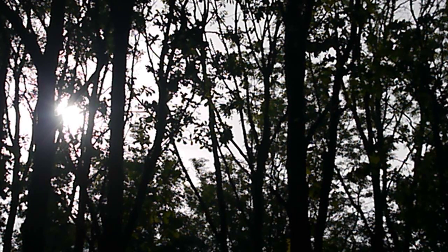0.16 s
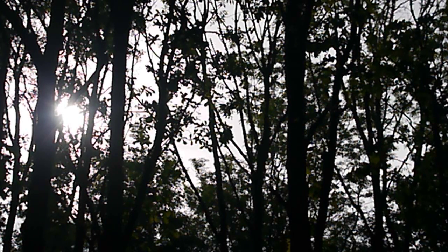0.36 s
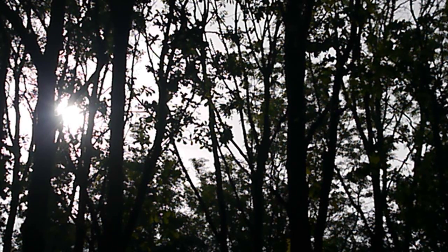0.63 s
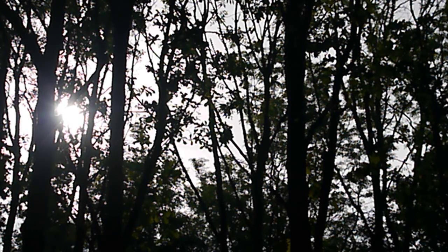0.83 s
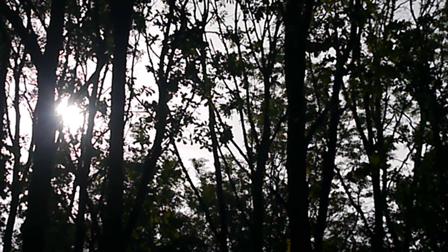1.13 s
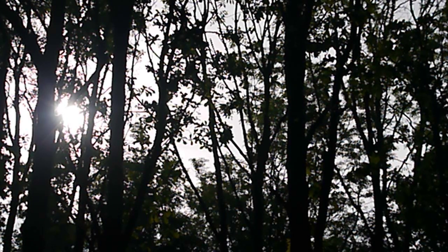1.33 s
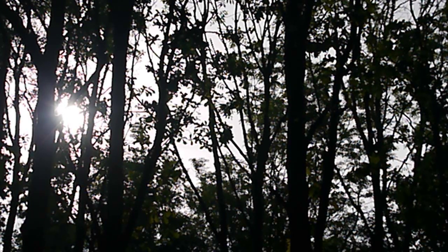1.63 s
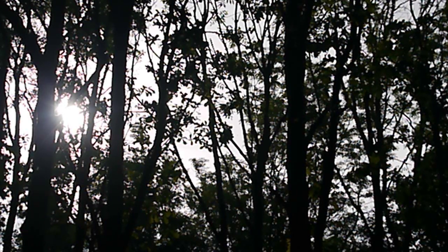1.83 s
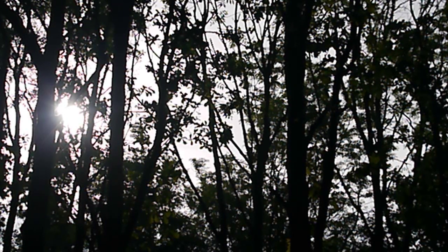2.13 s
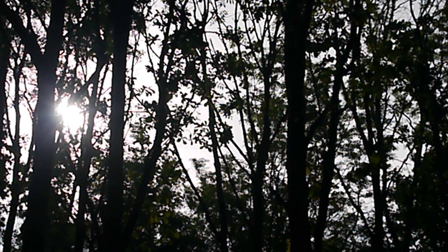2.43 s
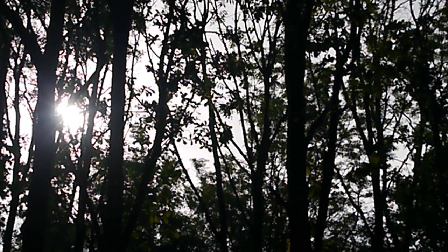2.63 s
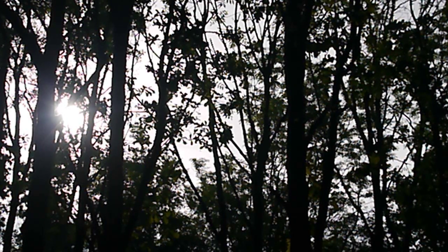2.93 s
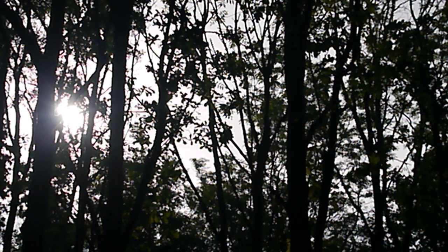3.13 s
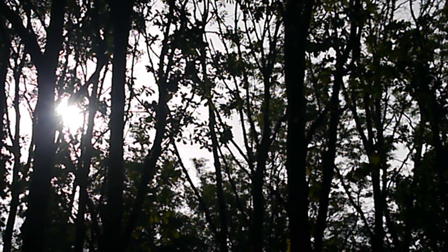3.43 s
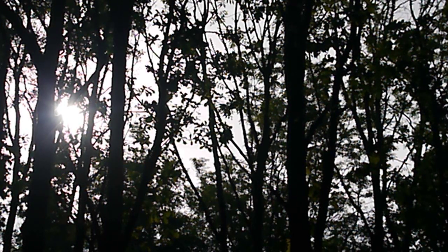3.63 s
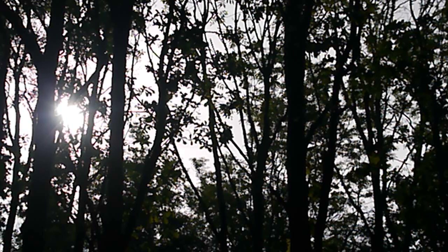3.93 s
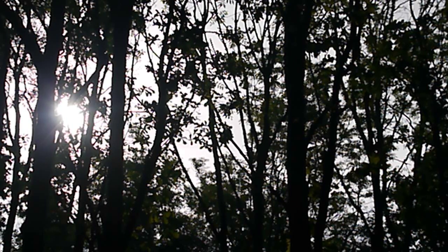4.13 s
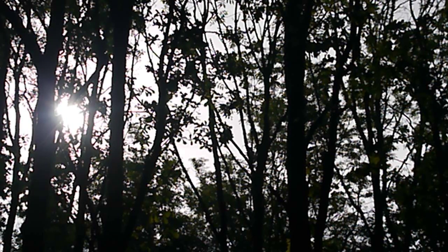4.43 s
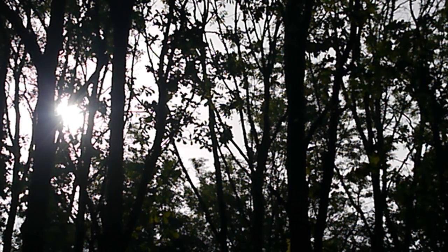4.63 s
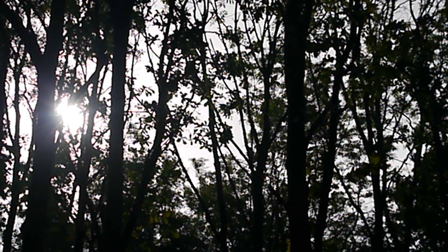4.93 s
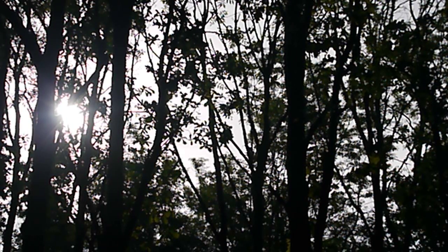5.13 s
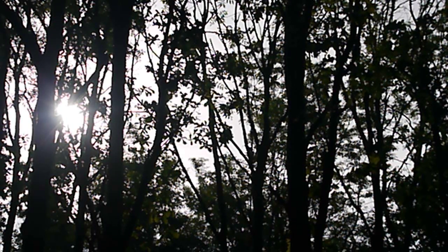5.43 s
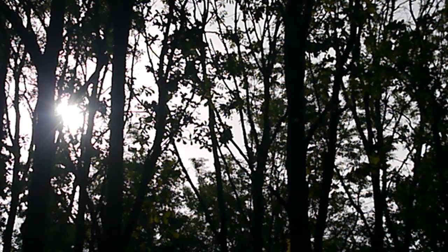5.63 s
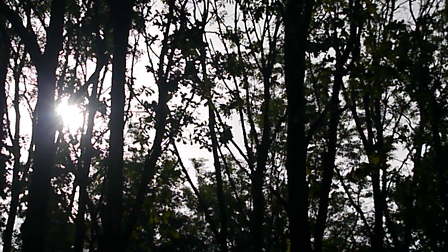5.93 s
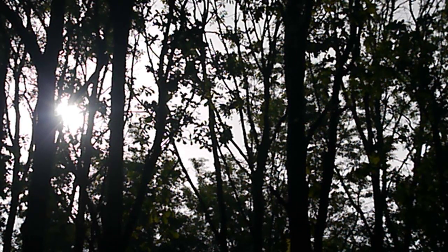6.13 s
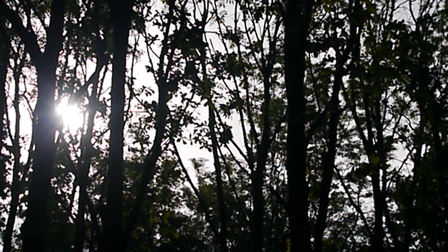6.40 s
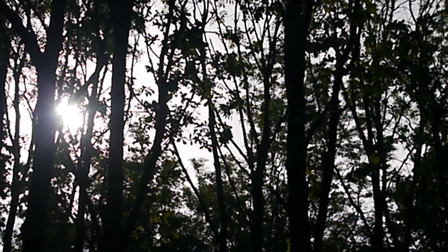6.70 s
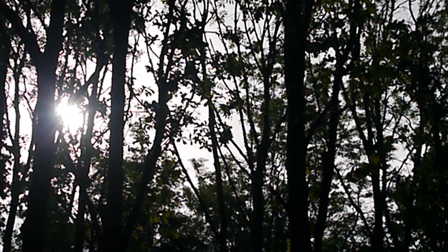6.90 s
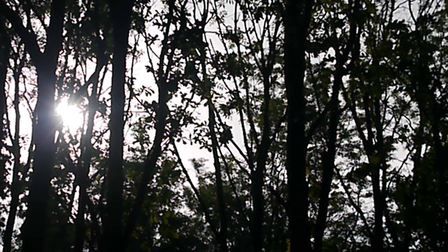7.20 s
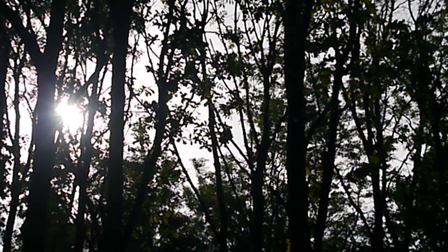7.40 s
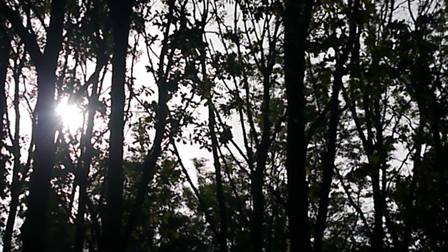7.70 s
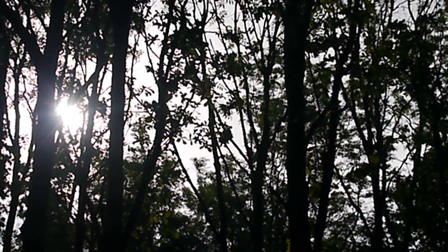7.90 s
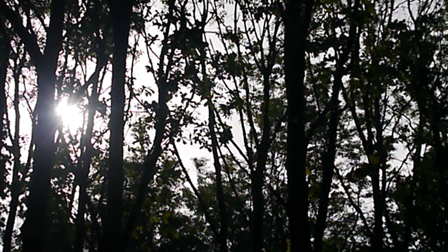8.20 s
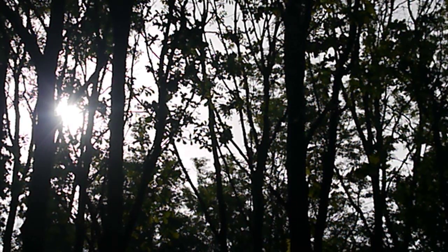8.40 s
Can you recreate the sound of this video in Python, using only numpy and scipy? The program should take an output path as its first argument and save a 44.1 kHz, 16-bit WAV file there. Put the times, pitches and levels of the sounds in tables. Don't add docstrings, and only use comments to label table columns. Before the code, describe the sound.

A single woody knock reverberates among trunks, then thin bird chirps, flutey notes and high whistles build up over soft, throaty pigeon coos.

```python
import sys
import numpy as np
from scipy import signal
from scipy.fft import rfft, irfft, next_fast_len
from scipy.io import wavfile
from scipy.ndimage import uniform_filter1d, map_coordinates

SR = 44100
rng = np.random.default_rng(int(sys.argv[2]) if len(sys.argv) > 2 else 0)


def bounce(signal):
    frames = np.transpose(np.atleast_2d(signal))
    limited = np.clip(frames, -1, 1)
    pcm = np.round(limited * 32767).astype(np.int16)
    wavfile.write(sys.argv[1], SR, pcm)


def undo_db(level):
    steps = np.asarray(level, float) / 20
    return 10 ** steps


N = 377055

# (time [s], level [dB])
AIR_LEVEL = [(0, -58), (1.3, -58), (1.83, -60), (3.62, -58), (6.119, -58.5), (7.241, -58), (8.55, -58.5)]
# (frequency [Hz], level [dB])
AIR_COLOUR = [(25, -43), (64, -16), (95, -21), (190, -16), (300, -10.5), (508, -4), (664, -5.5),
              (956, -2.5), (1380, -9.5), (2290, -15.5), (3200, -17), (4500, -21.5), (7300, -21.5),
              (8000, -25.5)]
# (frequency [Hz], level at the start [dB], growth [dB/s])
ENGINE_ORDERS = [
    (66, -80, 0.1),
    (132, -86, .9),
    (590, -69, -.9),
]
# (time [s], peak level [dB], centre frequency [Hz], T60 [s])
TWIGS = [
    (.698, -57, 4300, 0.019),
    (1.576, -53, 6700, 0.02),
    (1.617, -54, 4380, 0.0072),
    (4.292, -56, 3300, 0.024),
    (4.875, -55, 215, 0.075),
    (5.998, -52, 4380, 0.018),
    (5.972, -55, 6050, 0.019),
    (6.702, -52, 260, 0.14),
    (7.484, -55.5, 5730, 0.028),
    (8.06, -58, 4300, 0.022),
]
# (time [s], peak level [dB])
BLOW = (1.1272, -3.5)
# (frequency [Hz], level [dB], T60 [s])
TIMBER_MODES = [(155, -13.5, 0.029), (260, 1.5, 0.022), (800, -2.5, 0.021), (1060, -9, .018),
                (1380, -7.5, 0.016), (1900, -29, .03)]
# (frequency [Hz], level [dB])
ANSWER_COLOUR = [(35, -85), (60, -49), (156, -19), (290, -4.5), (400, -14), (526, -13.5), (660, -5.5),
                 (750, -1.5), (831, -5), (956, -9), (1770, -9.5), (2440, -25.5), (3160, -20.5),
                 (3930, -35.5), (5000, -38), (7000, -51), (9100, -86), (15400, -120)]
# (frequency [Hz], T60 [s])
ANSWER_DECAY = [(100, 1.75), (300, 1.6), (500, 1.7), (780, 1.9), (1100, 1.55), (2000, 1.31), (5000, 0.64)]
# (delay [s], level [dB])
TRUNK_ECHOES = [(0.036, 2.5), (0.082, 2.4), (0.142, 0.6), (.155, 4), (.29, 1.8)]
# (time [s], pitch [Hz], level [dB], hoarseness [0-1])
DISTANT_COOS = [
    [(0, 379.5, -62, .3), (.08, 430, -62, .5), (.17, 460, -63, .4)],
    [(3.84, 540, -64, .4), (3.9, 566, -63, .4), (3.97, 550, -66, .3)],
    [(4.3, 575, -64, .3), (4.45, 545, -65, .2), (4.62, 531, -63.5, .2), (4.7, 504, -62, .2)],
    [(4.9, 500, -65, .2), (5.01, 485, -63, .2)],
    [(5.58, 496, -66, .3), (5.7, 491, -61.5, .1), (5.76, 485, -66, .2)],
]
# (time [s], length [s], top pitch [Hz], level [dB])
ARCHED_COOS = [
    (6.312, 0.213, 692, -56.5),
    (6.734, 0.11, 722, -59.5),
]
# (time [s], pitch [Hz], level [dB], hoarseness [0-1])
COOS = [
    [(.315, 455, -61.5, 0.58), (.37, 521.7, -64.5, 1), (.44, 500, -61.5, 0.42), (.57, 457, -59.5, 0.4),
     (.62, 428, -68, 0.4)],
    [(.96, 419, -61, 0.74), (1, 470, -63, 0.95), (1.14, 512, -66, 0.6)],
    [(6.1, 430, -57, .1), (6.135, 491, -50.5, 0.35), (6.23, 501, -51.5, 0.56), (6.28, 520, -61, 1.09),
     (6.48, 513, -60, 0.74), (6.52, 506, -48.5, 0.2), (6.545, 439.5, -50.5, 0.27)],
    [(6.705, 440, -54.5, 0.4), (6.74, 506, -50.5, 0.55), (6.87, 533, -58, .8), (6.915, 512, -46.5, 0.3),
     (7.01, 485, -46.5, 0.13), (7.06, 431.5, -51, 0), (7.09, 413, -65, 0.1)],
    [(7.343, 434, -47.5, 0.14), (7.36, 495, -49.5, 0.25), (7.39, 528.5, -53, 0.6), (7.44, 522, -51, 0.63),
     (7.47, 507.7, -47, 0.4), (7.59, 475, -49, .55), (7.63, 455, -60.5, .7), (7.69, 537, -62.5, 0.34)],
    [(7.698, 507, -48, 0), (7.72, 487, -45, 0.18), (7.85, 451, -48.5, 0), (7.88, 440, -54.5, 0.17),
     (7.92, 435, -57, 0.4), (7.99, 415.5, -64, 0.24), (8.06, 414, -65, .3)],
    [(8.378, 420, -56, .05), (8.4, 488, -45.5, 0.07), (8.43, 541, -48.5, 0), (8.46, 574, -58, 0.46),
     (8.505, 538, -61, 0.78), (8.55, 500, -51, 1.16)],
]
# (time [s], length [s], start pitch [Hz], end pitch [Hz], level [dB])
TWITTERS = [(2.866, .2, 6050, 5150, -52), (3.074, .21, 5890, 5050, -53), (5.471, 0.13, 3310, 2045, -50),
            (5.859, 0.35, 8060, 6800, -52), (5.986, 0.21, 7940, 6780, -46), (6.061, 0.38, 4470, 2800, -58),
            (6.202, 0.4, 3044, 2296, -57), (6.546, 0.3, 7900, 5910, -63), (7.034, 0.11, 3890, 2724, -57.5),
            (7.511, 0.2, 4520, 3070, -69), (2.994, 0.14, 8750, 5940, -62.5), (3.166, .1, 6830, 5580, -61),
            (3.431, 0.27, 4315, 3416, -49.5), (8.28, .15, 6300, 5270, -65.5),
            (8.423, .13, 4680, 3360, -47.5), (7.301, 0.27, 3755, 2512, -52)]
# (time [s], length [s], pitch [Hz], level [dB])
FINCH_HELD = [(0, 0.016, 3786, -57), (.03, .02, 3470, -63.5), (.035, 0.012, 3780, -61),
              (.165, 0.052, 4296, -47), (.25, 0.047, 4290, -53.5), (.33, 0.1, 4260, -57),
              (.48, 0.072, 4260, -62), (.2, 0.14, 7270, -82), (.4, 0.21, 7400, -79.5),
              (.53, .06, 4200, -63.5), (1.96, 0.17, 4190, -69), (2.06, 0.046, 5660, -65),
              (3.33, 0.13, 4570, -54), (3.33, 0.035, 4010, -62), (3.45, .03, 4100, -57.5),
              (3.5, 0.043, 4145, -54.5), (3.66, 0.071, 4350, -56.5), (3.76, .1, 4340, -59),
              (3.88, 0.14, 4320, -66)]
# (time [s], start pitch [Hz], end pitch [Hz], level [dB])
FINCH_CHIRPS = [(0, 4510, 3480, -53.5), (.01, 6600, 5740, -71), (.02, 5460, 5000, -63),
                (.058, 5040, 4590, -56.5), (.09, 5170, 4700, -58), (.26, 4210, 4040, -52),
                (2.862, 6170, 5070, -59), (2.98, 5450, 4960, -57), (3.25, 5580, 5000, -59),
                (3.29, 5410, 4930, -56.5), (3.385, 4150, 3570, -56.5), (3.44, 4140, 3330, -56.5),
                (3.74, 4040, 3830, -58.5)]
# (time [s], length [s], pitch [Hz], level [dB])
THRUSH_HELD = [(3.7, .03, 1870, -60), (3.985, .03, 1830, -62), (4.35, .1, 2630, -68),
               (4.88, 0.046, 2230, -56.5), (4.485, .02, 2020, -56), (4.39, 0.12, 2020, -44.5),
               (4.64, 0.15, 2643, -58), (5.29, 0.1, 2560, -52.5), (5.48, 0.14, 1900, -49)]
# (time [s], start pitch [Hz], end pitch [Hz], level [dB])
THRUSH_RISES = [(3.695, 1830, 1900, -58), (3.715, 1900, 2180, -55.5), (3.975, 1790, 1870, -58),
                (4.015, 1873, 2190, -52.5), (4.29, 1827, 1860, -50), (4.36, 1904, 2040, -48.5),
                (4.82, 1802, 2080, -48), (4.86, 2140, 2250, -51), (5.25, 2380, 2556, -59.5),
                (5.64, 1950, 2010, -55.5)]
# (time [s], start pitch [Hz], end pitch [Hz], level [dB])
THRUSH_FALLS = [(4.72, 2005, 1700, -54), (4.755, 2300, 1750, -56), (4.96, 1950, 1790, -51.5),
                (5.01, 3150, 3050, -63.5), (5.18, 1840, 1780, -62), (5.26, 1735, 1700, -60),
                (5.58, 2500, 1910, -49.5)]
# (time [s], length [s], pitch [Hz], level [dB])
WARBLER_HELD = [(5.28, 0.074, 4450, -63.5), (5.82, .08, 4300, -67), (6.49, 0.029, 3880, -57),
                (6.69, 0.08, 4180, -60), (6.9, 0.027, 3810, -47.5), (6.96, .035, 3630, -46.5),
                (7.63, 0.026, 2084, -64), (8.028, 0.02, 3273, -54.5), (8.03, 0.061, 5580, -72),
                (8.07, .04, 4490, -74), (8.165, 0.027, 5450, -69), (8.18, 0.013, 2790, -59.5),
                (8.2, 0.015, 3320, -61), (8.23, 0.018, 2995, -56), (8.247, .012, 2860, -61),
                (8.515, 0.027, 3380, -50.5), (8.313, 0.0084, 4300, -55.5), (8.37, 0.017, 3360, -52)]
# (time [s], start pitch [Hz], end pitch [Hz], level [dB])
WARBLER_CHIRPS = [(5.348, 4075, 3540, -47.5), (5.375, 3534, 3020, -50.5), (5.41, 4100, 3036, -49),
                  (5.45, 3966, 3020, -55), (5.51, 2740, 2580, -52.5), (5.465, 3195, 2394, -46),
                  (6.062, 4500, 3800, -51), (6.088, 4010, 3320, -49.5), (6.17, 4400, 3020, -47.5),
                  (6.58, 3680, 3390, -57.5), (6.835, 4204, 3700, -49), (6.865, 3200, 2550, -59.5),
                  (6.93, 3810, 3016, -44.5), (7.01, 3665, 2630, -48), (7.105, 3900, 3530, -54.5),
                  (7.88, 2840, 2530, -61)]
# (time [s], start pitch [Hz], end pitch [Hz], level [dB])
WARBLER_FLICKS = [(8.015, 3050, 3270, -58.5), (8.195, 2750, 3050, -57), (5.9, 1800, 2300, -64)]
# (time [s], start pitch [Hz], end pitch [Hz], level [dB])
DEEP_CHIRPS = [(5.63, 3356, 2850, -52), (5.68, 2560, 2234, -52), (6.27, 4300, 3205, -48.5),
               (6.85, 3886, 3440, -46.5), (7.12, 3700, 2700, -51.5), (7.26, 3500, 2810, -53),
               (7.54, 3600, 3010, -61), (7.66, 3130, 2437, -55), (7.77, 3320, 3000, -55.5),
               (8.155, 6400, 5400, -62), (8.28, 6470, 5420, -62.5), (8.305, 5350, 4900, -60),
               (8.328, 4230, 3490, -51), (8.39, 3300, 2775, -52.5)]
# (time [s], pitch [Hz], level [dB])
PIPS = [(3.165, 3134, -66), (3.24, 2604, -67), (7.835, 1945, -62), (8.07, 2090, -60.5), (8.305, 1960, -64),
        (8.47, 1975, -72)]
# (time [s], length [s], pitch [Hz], level [dB])
ACCENTS = [(5.475, 0.039, 2560, -50.5), (5.35, .03, 1900, -64), (6.84, .03, 3900, -49),
           (6.875, 0.029, 3560, -51.5), (7.105, .025, 3600, -53.5), (7.5, 0.037, 3570, -60),
           (7.555, .025, 3220, -58), (.1, .03, 5020, -60.5), (8.2, .05, 3350, -62), (2.42, .12, 7900, -66),
           (2.56, .1, 7850, -66), (5.836, .012, 7250, -43), (4.368, .015, 1960, -55),
           (4.487, .015, 2020, -54), (5.355, .015, 3750, -54), (5.385, .015, 3800, -55),
           (5.47, .015, 3900, -56), (6.935, .02, 3250, -54), (7.03, .05, 2750, -57), (5.6, .05, 6800, -68)]
# (time [s], start pitch [Hz], end pitch [Hz], level [dB])
UPFLICKS = [(7.685, 2680, 3000, -59.5), (7.91, 2680, 2950, -59), (8.243, 2650, 3020, -55),
            (5.425, 3100, 3600, -55), (8.37, 3250, 3450, -55.5)]
# (time [s], length [s], pitch [Hz], level [dB])
ROBIN_HELD = [(2.29, .1, 7880, -64.5), (2.695, 0.032, 7720, -63.5), (4.7, 0.08, 6610, -55),
              (4.805, 0.024, 6320, -48.5), (5.09, 0.066, 7620, -45), (5.162, .02, 5580, -49.5),
              (5.822, .035, 7287, -38), (5.855, 0.011, 6430, -67.5), (5.888, .012, 7340, -43.5),
              (5.91, .08, 5220, -70.5), (6.05, .092, 7156, -41), (6.2, 0.1, 7050, -43.5),
              (6.205, 0.018, 8024, -42.5), (6.33, .1, 7130, -45.5), (6.4, 0.036, 8047, -41),
              (6.41, 0.058, 6980, -45), (6.52, .073, 7490, -39), (6.53, 0.028, 6370, -52.5),
              (6.575, 0.017, 6780, -42.5), (6.655, 0.1223, 7140, -38.5), (6.762, 0.024, 7970, -43)]
# (time [s], start pitch [Hz], end pitch [Hz], level [dB])
ROBIN_CHIRPS = [(2.75, 7830, 7440, -54.5), (4.678, 6530, 6720, -64), (4.99, 7850, 7420, -62),
                (5.128, 6450, 5940, -54.5), (5.135, 7450, 6570, -47), (5.153, 6890, 5590, -49),
                (6.015, 7980, 6800, -49), (6.16, 7820, 6230, -59), (6.37, 5500, 4650, -71),
                (6.517, 7630, 6300, -52.5), (6.567, 6980, 5650, -57)]
# (time [s], start pitch [Hz], end pitch [Hz], level [dB])
ROBIN_SLURS = [(4.975, 6860, 6340, -52.5), (5.02, 8000, 7550, -49), (5.07, 6860, 6370, -43.5),
               (5.535, 7980, 7750, -58), (5.6, 7040, 6600, -67), (5.61, 8050, 7600, -58.5),
               (5.68, 7280, 7800, -58), (5.76, 7680, 8060, -49.5)]
# (frequency [Hz], level [dB])
CONVERTER = [(7000, -1), (7700, -3), (8000, -11.5), (8400, -13.5), (8800, -29), (9100, -35)]


def unit(x):
    return x / np.sqrt(np.mean(x ** 2) + 1e-20)


def along(points, hz):
    f, v = np.transpose(points)
    return np.interp(np.log(hz + 1), np.log(f + 1), v)


def wobble(count, rate):
    knots = rng.standard_normal(int(count * rate / SR) + 4)
    return map_coordinates(knots, [np.arange(count) * rate / SR])


def smooth(knots, place):
    curve = map_coordinates(knots, [place])
    return curve - curve.mean()


def filtered(x, response):
    m = next_fast_len(len(x) + 8192)
    return irfft(rfft(x, m) * response(np.fft.rfftfreq(m, 1 / SR)), m)[:len(x)]


def add(track, s, sound):
    part = track[round(s * SR):][:len(sound)]
    part += sound[:len(part)]


def air():
    z = signal.stft(rng.standard_normal(N + 512), nperseg=512)[2]
    patches = uniform_filter1d(rng.standard_normal(z.shape), 8, 0)
    patches = uniform_filter1d(patches, 30, 1)
    noise = signal.istft(z * undo_db(0.87 * unit(patches)), nperseg=512)[1][:N]
    level_db = np.interp(np.arange(N) / SR, *np.transpose(AIR_LEVEL))
    return undo_db(level_db + 5.0) * unit(filtered(noise, lambda hz: undo_db(along(AIR_COLOUR, hz))))


def engine():
    swell_db, speed_wander = 2, 0.004
    turns = np.cumsum(1 + speed_wander * wobble(N, 2.7)) / SR
    t, out = np.arange(N) / SR, np.zeros(N)
    for hz, db, growth in ENGINE_ORDERS:
        level_db = db + growth * t + swell_db * wobble(N, 2.51)
        out += undo_db(level_db) * np.sin(2 * np.pi * hz * turns)
    return out


def twigs():
    out, t = np.zeros(N), np.arange(SR // 5) / SR
    for s, db, hz, t60 in TWIGS:
        width = 0.25 if hz > 1000 else 0.5
        noise = rng.standard_normal(len(t))
        puff = filtered(noise, lambda f: 1 / (1 + (np.log(f / hz + 1e-6) / width) ** 4))
        add(out, s, undo_db(db + 1.5 - 60 * t / t60) * unit(puff))
    return out


def timber_ring():
    t = np.arange(SR // 5) / SR
    ring = sum(undo_db(level - 60 * t / t60) * -np.sin(2 * np.pi * hz * t) for hz, level, t60 in TIMBER_MODES)
    return ring * (1 - np.exp(-(t / 0.0022) ** 2))


def wood_answer():
    hz, t, z = signal.stft(rng.standard_normal(2 * SR), SR, nperseg=256)
    lumps_db = sum(level * np.exp(-((t - delay) / 0.008) ** 2) for delay, level in TRUNK_ECHOES)
    age = np.sqrt(t ** 2 + 0.16 ** 2) - 0.12
    fade_db = lumps_db - 60 * age / along(ANSWER_DECAY, hz)[:, None]
    tail = signal.istft(z * undo_db(fade_db), SR, nperseg=256)[1]
    tail = unit(filtered(tail, lambda hz: undo_db(along(ANSWER_COLOUR, hz))))
    return tail * (1 - np.exp(-np.arange(len(tail)) / SR / 0.0013))


def blow():
    out = np.zeros(N)
    s, db = BLOW
    add(out, s, undo_db(db) * timber_ring())
    add(out, s + 0.002, undo_db(-38.5) * wood_answer())
    return out


def echoes(x, t60, direct_db, gather, near=0):
    t = np.arange(min(SR, round(0.8 * t60 * SR))) / SR
    tail = rng.standard_normal(len(t)) * undo_db(-60 * t / t60) * (1 - np.exp(-t / gather))
    tail *= 1 + near * np.exp(-t / 0.025)
    tail /= np.linalg.norm(tail)
    tail[0] = undo_db(direct_db)
    return signal.fftconvolve(x, tail)


def arched_coos():
    arch = [0.9, 0.96, 1, 0.96, 0.9]
    return [[(s + length * k / 4, hz * share, db, 0.06) for k, share in enumerate(arch)]
            for s, length, hz, db in ARCHED_COOS]


def pigeon(coos, t60, direct_db):
    rattle_hz, rattle_depth = 70.7, 1.04
    out, flutter, waver = np.zeros(N), wobble(N, 110), wobble(N, 110)
    rattle_turns = np.cumsum(rattle_hz * (1 + 0.147 * wobble(N, 30))) / SR
    flutter = 0.77 * flutter + rattle_depth * np.cos(2 * np.pi * rattle_turns)
    for rows in coos:
        s, *cols = np.transpose(rows)
        span = slice(round(s[0] * SR), min(round(s[-1] * SR), N))
        t = np.arange(N)[span] / SR
        hz, db, hoarse = [np.interp(t, s, c) for c in cols]
        tone = np.sin(2 * np.pi * np.cumsum(hz * (1 + 0.05 * hoarse * waver[span])) / SR)
        edges = np.clip(np.minimum(t - s[0], s[-1] - t) / 0.01, 0, 1)
        coo = undo_db(db) * edges * (1 + hoarse * flutter[span]) * tone
        add(out, s[0], echoes(coo, t60, direct_db, gather=0.087))
    return out


def held(rows, t60):
    return [(s, length, hz, hz * (1 - 0.0063), db, t60) for s, length, hz, db in rows]


def glides(rows, length, t60):
    return [(s, length, from_hz, to_hz, db, t60) for s, from_hz, to_hz, db in rows]


def songbird(notes, direct_db, gather, waver, flutter_db, settle, chirp_rate=0, near=0):
    out = np.zeros(N)
    for s, length, from_hz, to_hz, db, t60 in notes:
        pitch_knots, breath_knots, timing_knots = rng.standard_normal((3, 200))
        t = np.arange(round(np.clip(length, 0.006, 0.6) * SR)) / SR
        u = t / t[-1]
        if chirp_rate:
            u = (t * chirp_rate + 0.33 * smooth(timing_knots, 15 * t)) % 1
        hz = to_hz + (from_hz - to_hz) * (1 - u) ** settle
        hz = hz * (1 + waver * smooth(pitch_knots, 240 * t))
        breath_db = flutter_db * smooth(breath_knots, 150 * t) - 4 * u
        breath = np.abs(np.sin(np.pi * u)) ** 0.25 * undo_db(breath_db)
        whistle = breath * np.sin(2 * np.pi * np.cumsum(hz) / SR)
        gain = undo_db(db) * np.sqrt(SR / 10) / np.linalg.norm(whistle)
        add(out, s, gain * echoes(whistle, t60, direct_db, gather, near))
    return out


def pigeons():
    coos = pigeon(DISTANT_COOS, t60=0.5, direct_db=3)
    coos += pigeon(arched_coos(), t60=0.3, direct_db=5)
    return coos + pigeon(COOS, t60=0.45, direct_db=9)


def songbirds():
    twitter = [row + (0.8,) for row in TWITTERS]
    finch = held(FINCH_HELD, t60=0.99) + glides(FINCH_CHIRPS, length=0.014, t60=0.96)
    thrush = held(THRUSH_HELD, t60=0.87)
    thrush += glides(THRUSH_RISES, length=0.045, t60=1.0) + glides(THRUSH_FALLS, length=0.075, t60=0.94)
    warbler = held(WARBLER_HELD, t60=0.78) + glides(WARBLER_CHIRPS, length=0.014, t60=0.87)
    warbler += glides(DEEP_CHIRPS, length=0.022, t60=1.63) + glides(WARBLER_FLICKS, length=0.019, t60=0.6)
    warbler += glides([(s, hz, hz, db) for s, hz, db in PIPS], length=0.025, t60=0.2)
    accents = held(ACCENTS, t60=0.7) + glides(UPFLICKS, length=0.018, t60=0.45)
    robin = held(ROBIN_HELD, t60=0.82)
    robin += glides(ROBIN_CHIRPS, length=0.012, t60=0.89) + glides(ROBIN_SLURS, length=0.062, t60=0.88)
    birds = songbird(twitter, direct_db=-12, gather=0.01, waver=0.03, flutter_db=3, settle=1.1, chirp_rate=28)
    birds += songbird(finch, direct_db=-11, gather=0.008, waver=0.006, flutter_db=2, settle=1.3)
    birds += songbird(thrush, direct_db=-7, gather=0.006, waver=0.007, flutter_db=4, settle=1.2, near=0.8)
    birds += songbird(warbler, direct_db=-12, gather=0.007, waver=0.009, flutter_db=3, settle=1.2, near=0.4)
    birds += songbird(accents, direct_db=-6, gather=0.006, waver=0.012, flutter_db=4, settle=1, near=1)
    birds += songbird(robin, direct_db=-6, gather=0.005, waver=0.008, flutter_db=4, settle=1.3, near=1)
    return birds


def scene():
    return (air() + engine() + twigs() + blow() + pigeons() + songbirds())[None]


def roll_off(x):
    return signal.sosfilt(signal.butter(12, 8990, fs=SR, output="sos"), x)


def record(dry):
    half_rate_hz = 8000
    bass_cut = signal.lfilter(*signal.butter(2, 130, "high", fs=SR), dry[0])
    low = filtered(bass_cut, lambda hz: hz < half_rate_hz)
    mirrored = low * (1 + 2 * np.cos(2 * np.pi * 2 * half_rate_hz * np.arange(N) / SR))
    mix = filtered(mirrored, lambda hz: undo_db(along(CONVERTER, hz)) * np.clip((9030 - hz) / 120, 0, 1))
    return roll_off(mix[None])


dry = scene()
out = record(dry)
bounce(out)
```